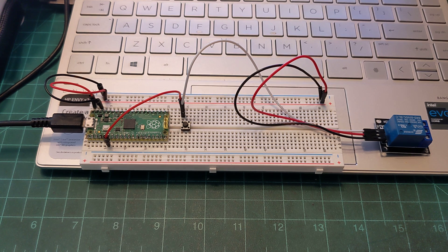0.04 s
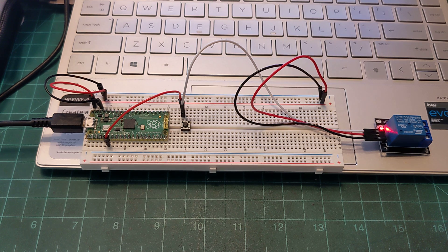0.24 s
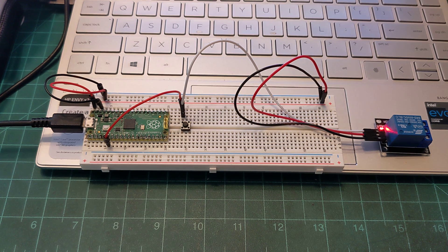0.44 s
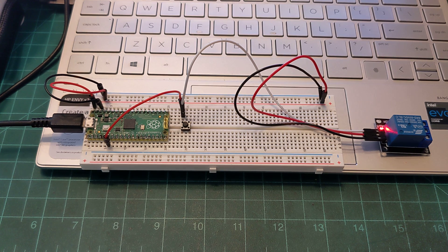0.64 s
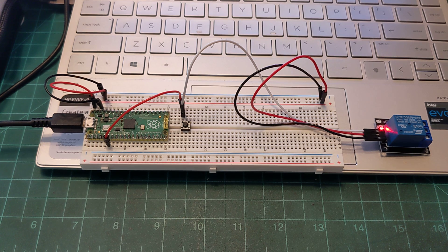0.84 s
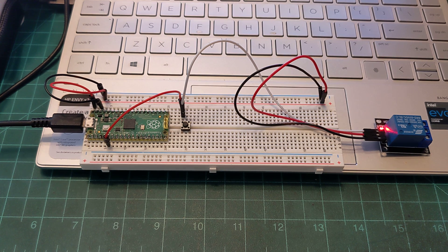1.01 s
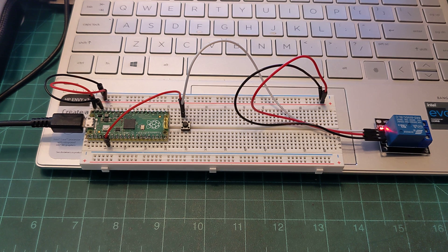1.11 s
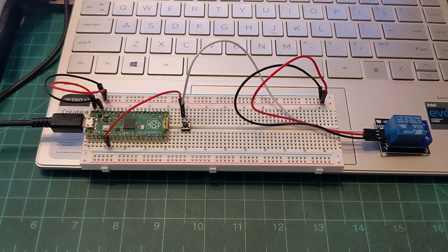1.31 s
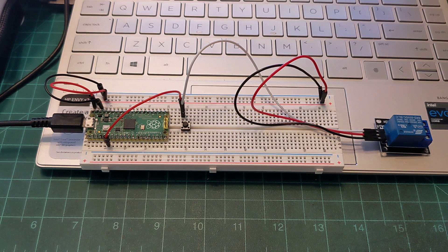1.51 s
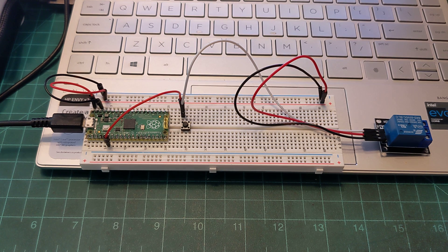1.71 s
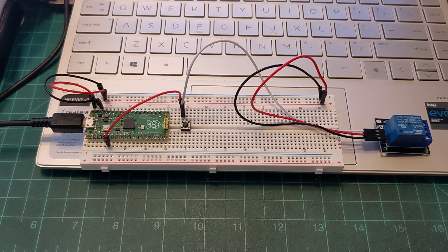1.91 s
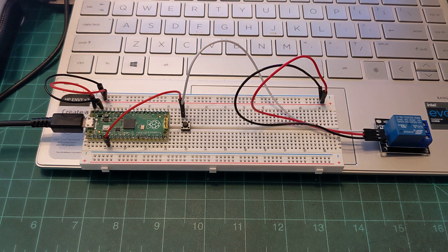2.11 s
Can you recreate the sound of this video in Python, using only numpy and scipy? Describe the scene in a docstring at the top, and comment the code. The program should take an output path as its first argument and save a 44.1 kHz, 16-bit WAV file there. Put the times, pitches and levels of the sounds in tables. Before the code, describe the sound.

A small relay clicks on, then clicks off a second later, over faint room ventilation noise.

```python
"""Two sharp clicks a second apart: a small relay on a desk pulls in, then drops out, above steady ventilation noise.
Each click is a row of blows, as armature and contact spring strike and bounce for a few milliseconds.
Every blow makes a noise snap and rings the stiff plastic case; the room answers with a short bright tail.
Behind them lie shaped noise with room resonances, a narrow high hiss, a mains hum and a faint fan whine.
A bright hiss swells and fades around the drop-out."""
import sys
import numpy as np
from scipy import signal
from scipy.fft import rfft, irfft, next_fast_len
from scipy.io import wavfile

SR = 44100
rng = np.random.default_rng(int(sys.argv[2]) if len(sys.argv) > 2 else 0)


def file_out(sig):
    """Save sig as 16-bit WAV at sys.argv[1]."""
    # one column per channel
    cols = np.atleast_2d(sig).T
    # limit, then scale
    lim = np.clip(cols, -1, 1)
    pcm = np.round(lim * 32767).astype(np.int16)
    wavfile.write(sys.argv[1], SR, pcm)


def volts_from_db(level):
    """Convert decibel levels to linear amplitude ratios."""
    exponent = np.asarray(level, float) / 20
    return 10 ** exponent


N = 94815   # length of the scene in samples
TOP_HZ = 15850   # room sound, ventilation noise and treble swell end here


def at_hz(rows, hz):
    """Reads table columns at any frequency, along straight lines on a log-frequency axis."""
    table_hz, *columns = np.transpose(rows)
    return np.array([np.interp(np.log(hz + 1), np.log(table_hz), column) for column in columns])


def drift(per_s):
    """Slow chance: random knots, per_s of them each second, joined by straight lines."""
    return np.interp(np.arange(N) / SR * per_s, np.arange(64), rng.standard_normal(64))


def band(x, low_hz):
    """Filters with a gentle low edge and a steep top edge."""
    x = signal.sosfilt(signal.butter(2, low_hz, "high", fs=SR, output="sos"), x)
    return signal.sosfilt(signal.cheby2(16, 50, TOP_HZ, fs=SR, output="sos"), x)


def hum():
    """Mains hum and fan whine: steady sines, the same in both ears."""
    # steady tones: f/Hz, rms level/dB
    tones = [(59.2, -63), (3413, -87)]
    t = np.arange(N) / SR
    total = np.zeros(N)
    for hz, level_db in tones:
        start_turn = rng.random()
        total += np.sqrt(2) * volts_from_db(level_db) * np.sin(2 * np.pi * (hz * t + start_turn))
    return total


def ventilation():
    """Noise shaped in frequency, partly shared by both microphones, reaching the right one a little later."""
    # broad air noise: f/Hz, left level/dB per Hz, right level/dB per Hz
    air = [(25.18, -106, -105), (41.44, -100, -92), (74, -90, -80), (300, -86.5, -85), (550, -89, -90),
           (1000, -90, -96.5), (1740, -101, -101), (3460, -102, -104), (4104, -109, -110),
           (6410, -112, -112), (10800, -118, -118), (16000, -120, -120)]
    # room resonances in that noise: f/Hz, width/Hz, left peak level/dB per Hz, right peak level/dB per Hz
    booms = [(108.8, 18.4, -70.5, -71.5), (164.1, 19, -72, -74), (232.7, 38.3, -73, -76),
             (318.8, 32, -79.5, -80.5), (405.3, 34, -83, -80.5), (433, 25, -86.5, -82.5),
             (647.6, 76, -89, -86.5), (815, 135, -101, -91.5), (1263, 216, -92.5, -99),
             (1424, 91.8, -92, -106), (2271, 305, -93, -100.5), (2940, 570, -99, -103),
             (7060, 910, -111, -108), (11750, 400, -116, -118)]
    # likeness of the two microphones: f/Hz, shared part of the power/0-1, lag of the right one/s
    likeness = [(60, 0.96, 0.000067), (242, 1, 0.000201), (500, 0.38, 0.00046), (690, .7, 0.00035),
                (962, 0.76, .00048), (1438, 0.9, 0.00074), (2380, 0.38, 0.00038), (3750, .05, .0004)]
    flicker_db, flicker_per_s = 0.3, 4.0

    size = next_fast_len(N)
    hz = np.fft.rfftfreq(size, 1 / SR)
    power = volts_from_db(at_hz(air, hz)) ** 2
    for centre_hz, width_hz, *levels_db in booms:
        bump = 1 / (1 + ((hz - centre_hz) / width_hz * 2) ** 4)
        power = power + volts_from_db(levels_db)[:, None] ** 2 * bump
    power = power * (hz < TOP_HZ)

    alike, lag_s = np.clip(at_hz(likeness, hz), 0, 1)
    shared, left, right = rfft(rng.standard_normal((3, size)))
    both = np.array([shared, shared * np.exp(-2j * np.pi * hz * lag_s)])   # a turning phase is a delay
    mixed = np.sqrt(alike) * both + np.sqrt(1 - alike) * np.array([left, right])
    noise = irfft(np.sqrt(power * SR / 2) * mixed, size)[:, :N]
    return noise * volts_from_db(flicker_db * drift(flicker_per_s))


def whistle():
    """A narrow band of hiss high in the ventilation noise, wavering in level."""
    centre_hz, width_hz = 9150, 450
    levels_db, waver_db = (-79, -99), 3   # levels: left and right, before the waver
    edges = [centre_hz - width_hz / 2, centre_hz + width_hz / 2]
    narrow = signal.butter(2, edges, "band", fs=SR, output="sos")
    noise = signal.sosfilt(narrow, rng.standard_normal((2, N)))
    return noise / noise.std() * volts_from_db(levels_db)[:, None] * volts_from_db(waver_db * drift(per_s=8.8))


def treble_swell():
    """Bright hiss, unrelated in the two ears, that rises and fades around the drop-out."""
    # course of the swell: t/s, gain on the filtered noise/dB
    swell = [(1.13, -95), (1.17, -72), (1.25, -66), (1.33, -62), (1.42, -73), (1.5, -88)]
    s, gain_db = np.transpose(swell)
    gain_db = np.interp(np.arange(N) / SR, s, gain_db, left=-200, right=-200)   # silent outside
    return volts_from_db(gain_db) * band(rng.standard_normal((2, N)), low_hz=5000)


def tail():
    """Response of the room: unrelated dying noise in each ear, scaled by the energy of its envelope."""
    first_echo_s, rise_s, t60_s = 0.0015, 0.001, 0.15   # t60: time to fall by 60 dB
    late = np.maximum(np.arange(SR // 2) / SR - first_echo_s, 0)
    shape = volts_from_db(-60 * late / t60_s) * (1 - np.exp(-late / rise_s))
    noise = band(rng.standard_normal((2, SR // 2)), low_hz=1000)
    return noise * shape / np.sqrt(np.sum(shape ** 2))


def ring(clicks, hz, t60_s):
    """One mode of the case: a unit click starts a dying sine of height 1, with its own phase in each ear."""
    r = volts_from_db(-60 / (t60_s * SR))   # what is left of the sine after one sample
    w = 2 * np.pi * hz / SR
    ears = []
    for ear, phase in zip(clicks, (0, 1.4)):   # left and right phase in radians
        start = [np.sin(phase), r * np.sin(w - phase)]
        # the tiny offset keeps the filter from slowing down on near-zero numbers
        ears.append(signal.lfilter(start, [1, -2 * r * np.cos(w), r * r], ear + 1e-18))
    return np.array(ears)


def crack(hits):
    """Broad noise snap of each blow: every hit starts a dying burst of noise without its low part."""
    t60_s, low_hz = 0.0066, 2850
    envelope = signal.lfilter([1], [1, -volts_from_db(-60 / (t60_s * SR))], hits)
    snap = envelope * rng.standard_normal(hits.shape)
    return signal.sosfilt(signal.butter(2, low_hz, "high", fs=SR, output="sos"), snap)


def relay(blows, which):
    """Every blow snaps and strikes every mode, neighbours in opposite sense; a blurred copy fills the room."""
    # modes of case and board: f/Hz
    ring_hz = [720, 1410, 2200, 3200, 4350, 5830, 6550, 7070, 7790, 8200, 9000, 9950, 11000, 12400, 12900,
               13700, 14600, 15600]
    # each mode: full t60/s, pull-in left level/dB, right level/dB, drop-out left level/dB, right level/dB
    rings = [(0.026, -47, -50.5, -39, -39.5), (0.054, -40.5, -43.5, -32, -36),
             (0.023, -39, -44.5, -36, -43.5), (0.028, -41.5, -38.5, -45, -40.5),
             (0.014, -44, -40, -32.5, -38), (0.011, -30.5, -28, -29, -24), (0.016, -32, -22.5, -26, -22.5),
             (0.013, -27, -37, -22.5, -26.5), (0.019, -17, -32, -27, -24), (.018, -21, -24.5, -24, -38),
             (0.016, -20, -28, -22, -41), (0.01, -26, -40, -20.5, -42), (0.0064, -22.5, -38, -31, -33),
             (0.0093, -23.5, -24, -25, -35), (0.0091, -15.5, -32, -21.5, -42), (0.0124, -22, -22, -30, -31),
             (.012, -30, -24, -36, -35), (.01, -36, -23, -44, -39)]
    crack_db, strike_spread_db, thud_below_hz = -26.5, 1.5, 2600
    ring_share = (0.84, 0.74)[which]   # share of each t60 left after pull-in and drop-out
    room_db = (-11.5, -13)[which]   # gain of the room tail after pull-in and drop-out
    room_blur = 0.4   # the room hears the case from all sides: its rings keep this share of their t60

    s, db, thud_db = np.transpose(blows)
    start = int(s.min() * SR)
    at = (s * SR).astype(int) - start
    hits = np.zeros((2, SR // 4))
    hits[:, at] = volts_from_db(db + crack_db)
    dry = spread = crack(hits)
    for k, (hz, (t60_s, *levels_db)) in enumerate(zip(ring_hz, rings)):
        blow_db = (db + thud_db * (hz < thud_below_hz))[:, None]
        strength_db = blow_db + strike_spread_db * rng.standard_normal((len(s), 2))
        ears_db = levels_db[2 * which:2 * which + 2]
        clicks = np.zeros_like(hits)
        clicks[:, at] = (-1) ** k * volts_from_db(strength_db + ears_db).T
        t60_s = t60_s * ring_share
        dry = dry + ring(clicks, hz, t60_s)
        spread = spread + ring(clicks, hz, t60_s * room_blur) / np.sqrt(room_blur)   # shorter, so made louder

    wet = volts_from_db(room_db) * signal.fftconvolve(spread, tail(), axes=1)
    out = np.zeros((2, N + SR))
    out[:, start:start + dry.shape[1]] += dry
    out[:, start:start + wet.shape[1]] += wet
    return out[:, :N]


def scene():
    """Both switchings over the noise of the room."""
    # blows of armature and contacts when the coil is switched on: t/s, level/dB, extra level of low modes/dB
    pull_in = [(.2192, -45, 0), (.2202, -12.5, 11), (.2207, 1.5, -5), (.2214, -3.5, -1.5),
               (.2231, -14.5, 4), (.2246, -19.5, 14), (.2305, -15.5, -6)]
    # blows when the spring throws them back: t/s, level/dB, extra level of low modes/dB
    drop_out = [(1.2194, -16, 3.5), (1.2207, -2, -35), (1.2216, -7, 7), (1.2231, 0.5, 1), (1.2242, -7, -30),
                (1.2256, -7, 9), (1.2299, -11, -3), (1.2329, -22, -4)]
    background = hum() + ventilation() + whistle() + treble_swell()
    return background + relay(pull_in, which=0) + relay(drop_out, which=1)


def band_limit(x):
    """A steep low-pass at the top of the band."""
    return signal.sosfilt(signal.butter(12, 16830, fs=SR, output="sos"), x)


def record(dry):
    """Top edge of the sound: a steep filter removes what lies above 16.9 kHz."""
    top_cut = signal.cheby2(10, 45, 16900, fs=SR, output="sos")
    mix = signal.sosfilt(top_cut, dry)
    return band_limit(mix)


dry = scene()
out = record(dry)
file_out(out)
```